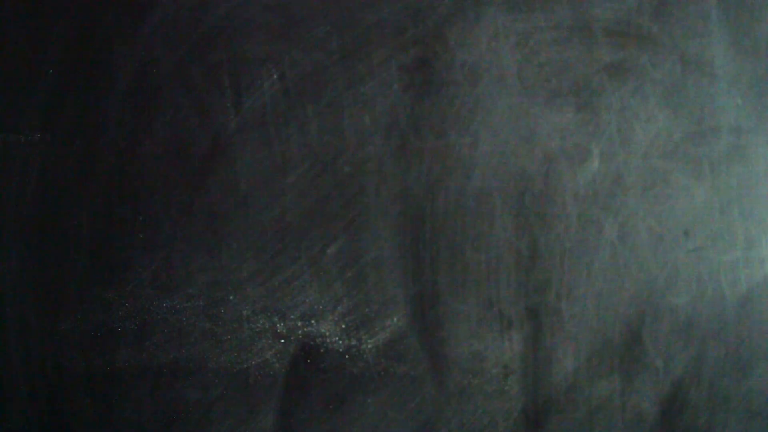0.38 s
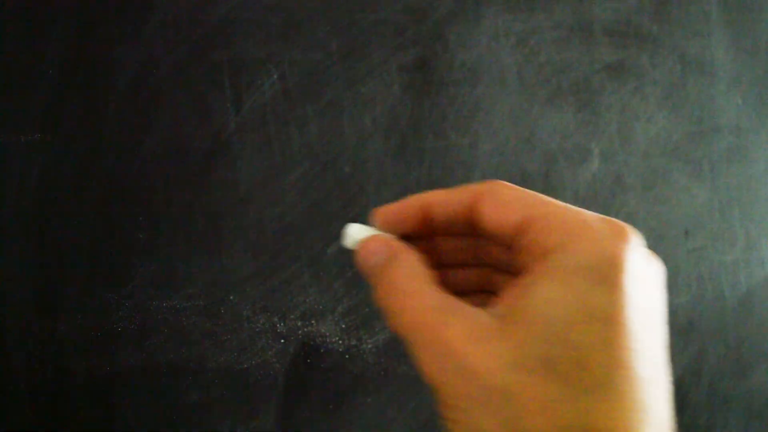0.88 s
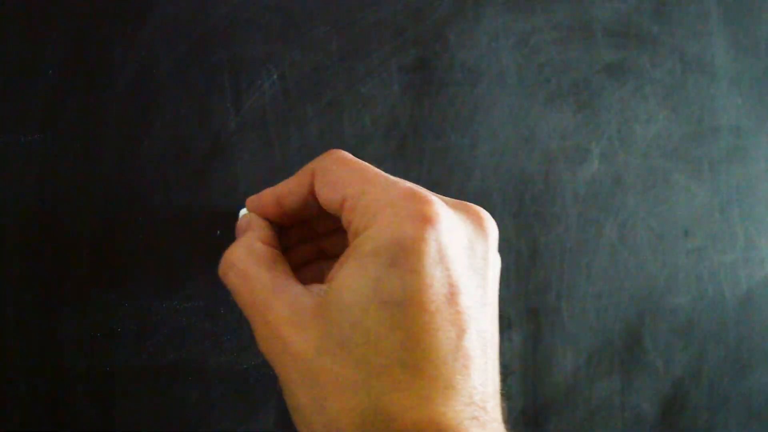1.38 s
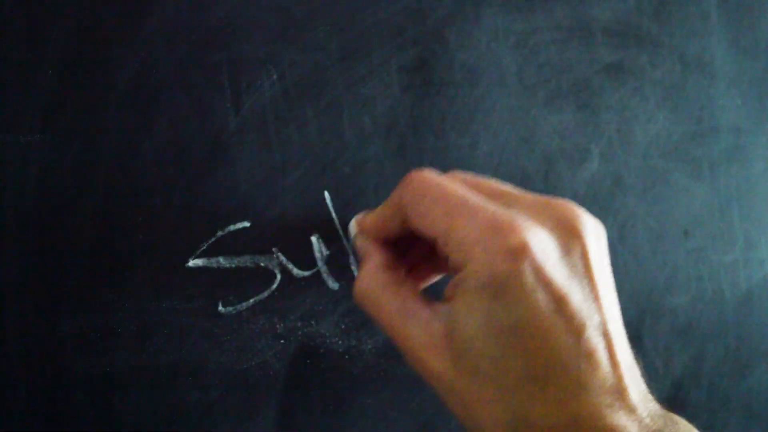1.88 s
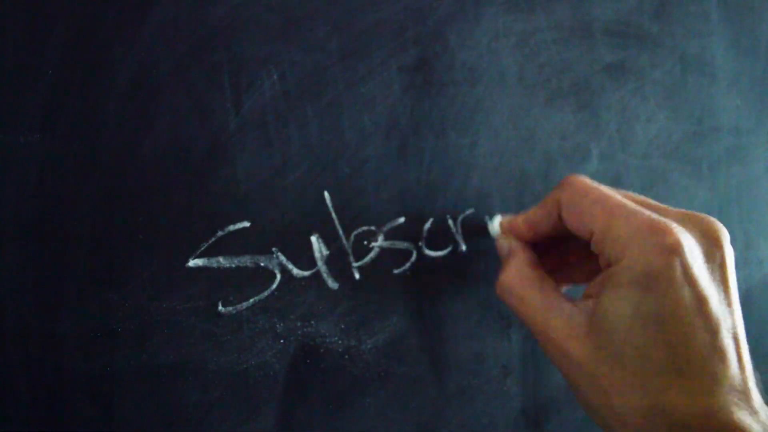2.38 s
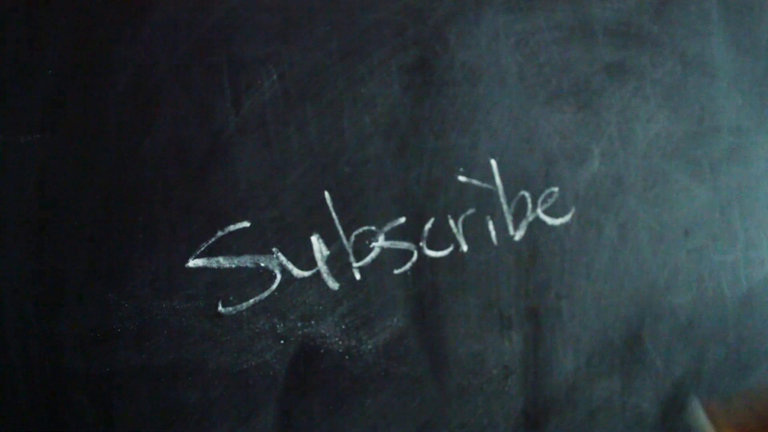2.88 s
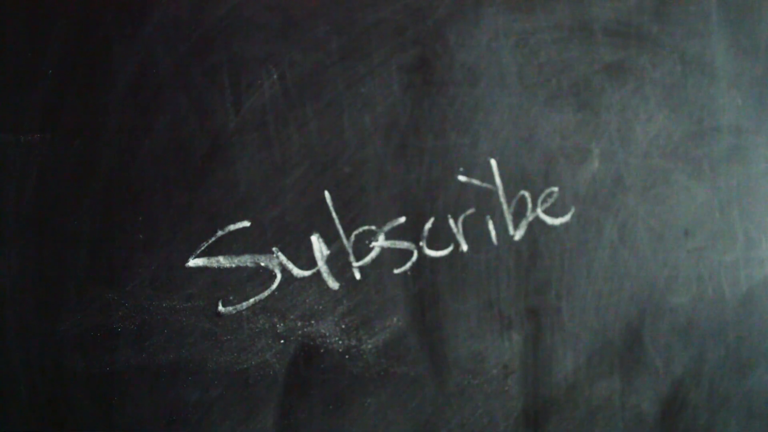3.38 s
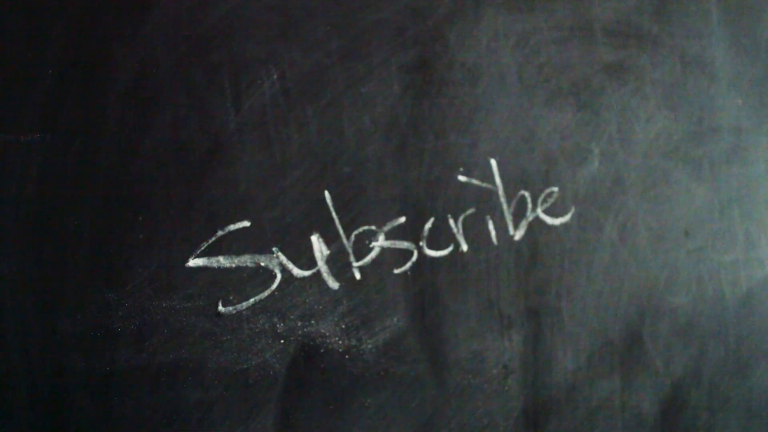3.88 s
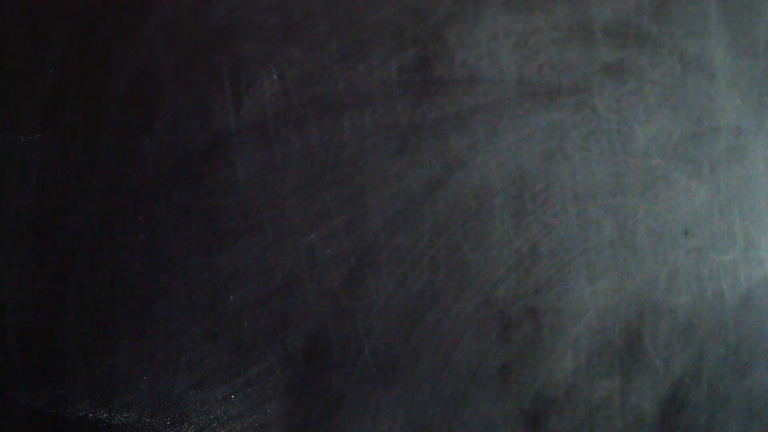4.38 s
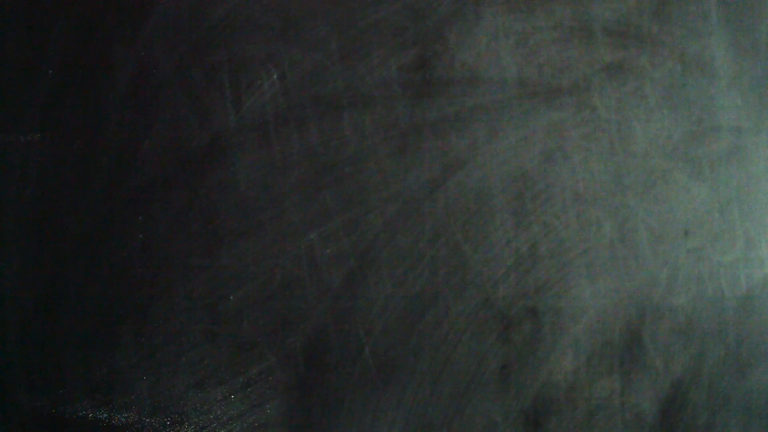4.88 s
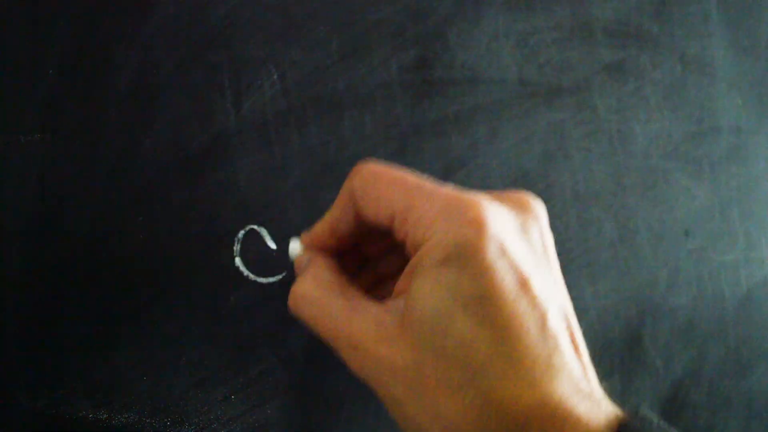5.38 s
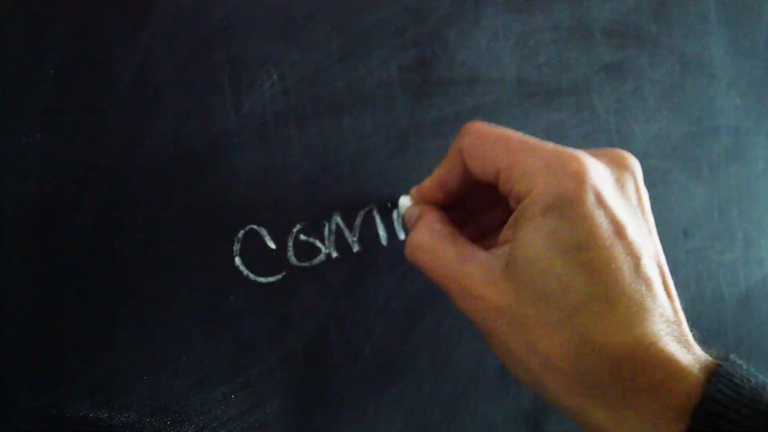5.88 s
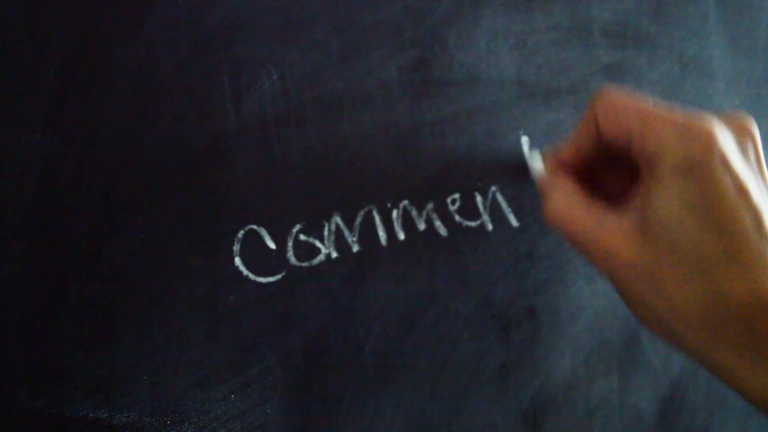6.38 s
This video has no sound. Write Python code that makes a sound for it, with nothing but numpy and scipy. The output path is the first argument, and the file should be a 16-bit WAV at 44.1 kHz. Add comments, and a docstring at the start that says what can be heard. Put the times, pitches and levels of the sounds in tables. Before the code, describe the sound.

Sped-up writing on a hollow board: a brief soft brush first, a pause, then chalk taps alternating with dry scratchy strokes and a loud final tap. Quiet again, then one broad felt swish with a low shudder, slight cloth rustle, and another run of brisk tapping and scratching, cut off mid-writing. Close mono pickup, reflective room, a faint noisy tail and very thin high whine.

```python
"""Chalk writes on a thin blackboard, heard sped up: crumbling taps, then short hissing, grating strokes.
Random crumbling forces excite the modes of the panel, which thuds and drones; powder adds shaped noise.
A felt eraser hisses as uneven noise; softer blows are things put down, and lumpy noise is a sleeve rustling.
Short tones tick and squeak, and a hard room answers with early taps and a faint long noise echo.
Still air and a thin steady whine lie beneath."""
import sys
import numpy as np
from scipy import signal
from scipy.fft import rfft, irfft
from scipy.io import wavfile
from scipy.ndimage import uniform_filter1d

SR = 44100
rng = np.random.default_rng(int(sys.argv[2]) if len(sys.argv) > 2 else 0)


def inscribe(sig):
    """Save sig as 16-bit PCM at rate SR to the path in sys.argv[1].

    A 1-D sig is mono; a 2-D sig holds one channel per row.
    Samples are clipped to [-1, 1] before scaling.
    """
    pcm = np.round(np.clip(np.atleast_2d(sig).T, -1, 1) * 32767)
    wavfile.write(sys.argv[1], SR, pcm.astype(np.int16))


def invert_db(x):
    """Field ratio 10**(x/20) for x, a level in decibels (scalar or array-like)."""
    u = np.asarray(x, float) / 20
    return 10 ** u


N = 287532  # samples

# chalk landing on the board: t/s, thud f/Hz, thud level/dB, knock level/dB, crack level/dB
CHALK_TAPS = [(1.383, 157, -77, -41.5, -58), (1.637, 219, -42, -35.5, -44.5), (1.839, 170, -29.5, -43, -42),
              (2.034, 167, -41.5, -39, -49), (2.182, 107, -37.5, -33, -57), (2.271, 152, -34.5, -41, -53),
              (2.413, 133, -39.5, -30, -27), (2.514, 161, -32, -30, -30), (2.835, 165, -28.5, -23, -12.5),
              (5.269, 146, -50, -42.5, -61.5), (5.47, 159, -32.5, -34.5, -21),
              (5.616, 100, -42.5, -45.5, -57), (5.866, 166, -40.5, -31, -30), (6.097, 107, -33, -38, -46),
              (6.25, 104, -32.5, -33, -40.5), (6.419, 107, -28, -29.5, -35), (6.519, 91, -33.5, -30.5, -21)]
# eraser, knuckles and things put down: t/s, thud f/Hz, thud level/dB, knock level/dB, crack level/dB
SOFT_BUMPS = [(0.069, 286, -31, -43, -43.5), (0.097, 305, -56, -44.5, -47), (0.161, 328, -54, -64, -87),
              (0.283, 434, -51.5, -62, -77), (0.305, 71, -55, -87, -94), (0.823, 129, -38, -61.5, -68),
              (0.844, 137, -39.5, -59, -61), (0.969, 180, -69, -63, -87), (1.289, 204, -63, -68, -87),
              (2.806, 294, -42.5, -62, -64.5), (2.877, 130, -40.5, -46.5, -61), (3.007, 136, -50, -75, -97),
              (3.041, 278, -47, -120, -97), (3.227, 330, -56, -58, -80), (4.099, 193, -57.5, -61.5, -49),
              (4.602, 310, -69.5, -60.5, -69), (4.908, 203, -87.5, -58.5, -72.5),
              (5.012, 194, -62, -60.5, -73)]
# short pieces of chalk stroke, and a few drones just after taps: t/s, length/s, hiss level/dB, drone level/dB
STROKE_PIECES = [(1.43, 0.058, -45.5, -52), (1.483, 0.037, -38, -58), (1.52, 0.049, -45, -48),
                 (1.651, 0.056, -44, -66), (1.705, 0.031, -47, -49.5), (1.739, 0.045, -45, -60.5),
                 (1.803, 0.033, -60, -67), (1.839, 0.047, -44, -53), (1.89, 0.047, -49.5, -64),
                 (1.926, 0.079, -48, -60.5), (2.04, 0.033, -44.5, -49.5), (2.074, 0.063, -45, -56.5),
                 (2.172, 0.076, -48, -53.5), (2.277, 0.042, -49, -53.5), (2.322, 0.068, -53, -52.5),
                 (2.417, 0.028, -46, -45), (2.454, 0.034, -72, -47.5), (2.523, 0.036, -39.5, -52),
                 (2.565, 0.038, -45.5, -49), (2.609, 0.052, -46, -61), (2.664, 0.05, -43.5, -62.5),
                 (2.707, 0.093, -47, -58), (2.852, 0.038, -66, -47), (5.268, 0.047, -67, -59.5),
                 (5.31, 0.079, -52.5, -45.5), (5.357, 0.079, -47, -62), (5.479, 0.045, -48.5, -57),
                 (5.507, 0.047, -46, -56), (5.541, 0.052, -51, -40), (5.63, 0.025, -46, -51),
                 (5.665, 0.031, -45, -46.5), (5.697, .043, -47.5, -59), (5.743, 0.04, -46.5, -50.5),
                 (5.784, 0.044, -48, -63), (5.877, 0.024, -44.5, -43), (5.908, .031, -46.5, -46),
                 (5.944, 0.04, -47, -55.5), (5.988, 0.046, -50, -55.5), (6.034, 0.038, -49, -52),
                 (6.115, 0.044, -55.5, -45), (6.142, 0.085, -49.5, -55.5), (6.22, 0.0043, -70, -55),
                 (6.248, 0.04, -45.5, -44.5), (6.296, 0.026, -46.5, -46), (6.326, 0.049, -46.5, -52),
                 (6.422, 0.048, -38, -51.5)]
# felt across the board, one list a pass: t/s, hiss level/dB
FELT_PASSES = [
    [(0.0, -35), (0.032, -37), (0.058, -49)],
    [(4.11, -53), (4.138, -39.5), (4.224, -33.5), (4.296, -40), (4.386, -41.5), (4.406, -61)],
]
# hand and sleeve moving: t/s, length/s, rustle level/dB, brushing level/dB (both before the sag)
SLEEVE_MOVES = [(0.12, 0.037, -54, -59), (0.258, 0.056, -64, -58.5), (0.792, 0.17, -66.5, -60.5),
                (.98, 0.074, -75, -70.5), (2.981, 0.01, -83, -46), (3.945, 0.14, -74.5, -65.5),
                (4.404, .17, -61.5, -89), (4.602, 0.31, -64.5, -84.5), (4.9, 0.052, -60.5, -75),
                (4.969, 0.034, -62.5, -80), (5.016, 0.073, -50, -59), (5.108, 0.19, -59.5, -67)]
# modes of the board: nominal f/Hz, width/Hz, nominal level/dB
BOARD_MODES = [(44.5, 33, -3), (98, 76, -4), (130, 140, -3.5), (220, 81, -3.5), (264.7, 60, -3.5),
               (331, 55, 1), (497, 77, -5.5), (680, 80, -8.5), (820, 80, -9), (1082, 68, -9.5),
               (1335, 66, 1.5), (1444, 70, -13.5), (1804, 50, -0.5), (2080, 300, -7.5), (2610, 710, -9.5),
               (3120, 1200, -17), (3671, 100, -17), (4360, 900, -18), (5870, 100, -16.5), (6700, 220, -11)]
# band edges of thud, panel and knock: lower f/Hz, upper f/Hz
REGISTER_EDGES = [(38, 900), (230, 700), (560, 7000)]
# spectrum of the dust's hiss and crack, with a bright peak near 9.5 kHz that other sounds share: f/Hz, relative
# level/dB
POWDER_SPECTRUM = [(2650, -24.5), (4500, -15), (5240, -10.5), (5660, -9), (7010, -4.5), (7660, -6.5),
                   (9490, 5), (11200, -4), (14400, -25.5), (15700, -32.5)]
# spectrum of rubbing felt: f/Hz, relative level/dB
FELT_SPECTRUM = [(88, -17), (150, -12.5), (197, -21), (235, -42), (291, -15), (621, -36.5), (725, -30),
                 (2240, -17), (3180, -19), (9640, -2.5), (15700, -18.5)]
# spectrum of moving cloth: f/Hz, relative level/dB
CLOTH_SPECTRUM = [(80, -16), (200, -3.5), (450, -16), (800, -4), (1150, -10), (1500, -10.5), (2100, -10.5),
                  (2900, -10), (3300, -12), (3600, -21), (6000, -74.5)]
# spectrum of still air: f/Hz, relative level/dB
AIR_SPECTRUM = [(20, 3), (40, -0.5), (65, -24.5), (130, -19), (300, -2.5), (530, -18), (1500, -13),
                (2800, -25), (5000, -21), (9700, -19), (13000, -19), (15500, -14.5)]
# thin electrical tone: f/Hz, rms level/dB
WHINE_TONES = [(15692, -76)]
# small ticks and squeaks: centre t/s, f/Hz, peak level/dB, swell half-length/s
TICKS_AND_SQUEAKS = [(.862, 2120, -49, 0.0028), (0.976, 2095, -52, 0.0036), (1.285, 1284, -57, 0.0084),
                     (3.274, 1730, -65.5, 0.023), (4.334, 1480, -37, .006), (5.012, 2930, -40, 0.0011),
                     (6.327, 820, -41, 0.0084)]
# reverberation of the room: f/Hz, t60/s
ROOM_T60 = [(100, 2.2), (400, 1.8), (1500, 2.3), (5000, 3.4), (12000, 3.7)]
# colour of the long echo: f/Hz, gain/dB
LONG_ECHO_COLOUR = [(35, 0), (70, -15.5), (130, -1.5), (300, 1.5), (1500, -0.5), (3200, -1), (6000, -3),
                    (10000, -6), (15000, 1.5)]

AIR_DB, EARLIER_WIPE_DB = -74, -55  # the earlier wiping at t = 0
ECHO_DB, BLOW_SEND_DB, EARLY_DB = -11.5, -4.5, -11
SPOT_DB = 2.8  # spread of a mode's strength from place to place
# the panel register lies between thud and knock
PANEL_SHARE, TAP_PANEL_DB, BUMP_PANEL_DB = 0.47, 0, -1.5
# a bump whose crack nears its thud or knock reaches the high modes
SOFT_TOP_HZ, HARD_TOP_HZ, HARD_FROM_DB = 2410, 8100, -9
# grating grows with speed (dB per dB of hiss) and with pressure (dB per dB of drone)
GRIT_DB, GRIT_BY_HISS, GRIT_BY_DRONE = -53.5, 0.15, 0.4
USUAL_HISS_DB, USUAL_DRONE_DB = -48, -53
# the drone is low just after a tap and climbs as the letter goes on
LANDED_HZ, UNDERWAY_HZ, SETTLE_S = 269, 484, 0.12
# the hand leans in and the panel shakes
SHUDDER_S, SHUDDER_DB, SHUDDER_RISE_S, SHUDDER_FALL_S = 4.19, -49, 0.02, 0.049
RUSTLE_RISE_S, RUSTLE_FALL_S, RUSTLE_SAG_DB_PER_S = 0.033, 0.06, 42.5


def evened(x):
    """Normalisation: scales a signal to rms 1."""
    return x / np.sqrt(np.mean(x ** 2, -1, keepdims=True) + 1e-20)


def smooth_noise(n, size):
    """Moving average of white noise: a slow random curve of rms 1."""
    return evened(uniform_filter1d(rng.standard_normal(n), size=size))


def read(points, hz):
    """Interpolation of a spectrum on a logarithmic frequency axis."""
    f, value = np.transpose(points)
    return np.interp(np.log(hz + 1), np.log(f + 1), value)


def add(mix, s, sound):
    """Superposition: mixes a sound in at s seconds."""
    part = mix[max(round(s * SR), 0):][:len(sound)]
    part += sound[:len(part)]


def crumbs(n, spread_db):
    """Impulsive noise: dense clicks of random sign, a few of them large, rms 1."""
    size_db = spread_db * np.minimum(rng.exponential(1, n), 5)
    return evened(rng.standard_normal(n) * invert_db(size_db))


def coloured(x, points):
    """Linear filtering: weights the spectrum of x, then restores rms 1."""
    gain = invert_db(read(points, np.fft.rfftfreq(len(x), 1 / SR)))
    return evened(irfft(rfft(x) * gain, len(x)))


def background():
    """Stationary noise of still air, with a thin steady sinusoidal whine."""
    t = np.arange(N) / SR
    whine = sum(np.sqrt(2) * invert_db(db) * np.sin(2 * np.pi * hz * t) for hz, db in WHINE_TONES)
    return invert_db(AIR_DB) * coloured(rng.standard_normal(N), AIR_SPECTRUM) + whine


def earlier_wiping():
    """Exponential decay: the echo of wiping just before dies away at 30.8 dB/s."""
    t = np.arange(N) / SR
    return invert_db(EARLIER_WIPE_DB - 30.8 * t) * coloured(rng.standard_normal(N), FELT_SPECTRUM)


def near_walls(x):
    """Early reflection: convolution with a quick cluster of sparse random taps."""
    taps, at = np.zeros(8192), np.arange(300, 8160, 20)
    taps[at + rng.integers(0, 20, len(at))] = rng.choice([-1., 1.], len(at))
    taps *= invert_db(-60 * np.arange(len(taps)) / SR / 0.037)  # t60 of 37 ms
    return invert_db(EARLY_DB) * signal.fftconvolve(x, taps / np.linalg.norm(taps))[:N]


def long_echo(x):
    """Diffuse field: the power of each band fills a store that drains by its t60 and sounds as noise."""
    hz, t, z = signal.stft(x, SR, nperseg=1024, noverlap=768)
    power = uniform_filter1d(abs(z) ** 2, size=15, axis=0)
    # above 1.7 kHz the echo's spectrum is smoothed more widely
    power[40:] = uniform_filter1d(power, size=70, axis=0)[40:]
    keep = invert_db(-120 * t[1] / read(ROOM_T60, hz))  # share of power kept from frame to frame
    store = np.array([signal.lfilter([0, 0, 0, 1 - k], [1, -k], p) for k, p in zip(keep, power)])
    real, imaginary = rng.standard_normal((2,) + z.shape)
    size = np.sqrt(abs(store)) * invert_db(read(LONG_ECHO_COLOUR, hz))[:, None]
    field = size * (real + 1j * imaginary)
    return invert_db(ECHO_DB) * signal.istft(field, SR, nperseg=1024, noverlap=768)[1][:N]


def chirps():
    """Narrow-band tones: sinusoids under a soft Gaussian swell."""
    t = np.arange(N) / SR
    return sum(invert_db(db) * np.exp(-((t - s) / length) ** 2) * np.sin(2 * np.pi * hz * t)
               for s, hz, db, length in TICKS_AND_SQUEAKS)


def sleeve():
    """Friction noise of cloth, lumpy, with a bright brushing; each move starts briskly and slackens."""
    t, gains = np.arange(N) / SR, np.zeros((2, N))
    for s, length, *levels_db in SLEEVE_MOVES:
        rise = (t - s) / RUSTLE_RISE_S
        fall = 1 + (s + length - t) / RUSTLE_FALL_S
        edge = np.clip(np.minimum(rise, fall), 0, 1)
        sag = invert_db(-RUSTLE_SAG_DB_PER_S * np.clip(t - s, 0, 1))
        gains += invert_db(np.array(levels_db))[:, None] * edge * sag
    lumps = invert_db(2.5 * smooth_noise(N, 600))
    z = signal.stft(lumps * coloured(crumbs(N, 3.0), CLOTH_SPECTRUM), nperseg=512)[2]
    folds = uniform_filter1d(rng.standard_normal(z.shape), size=9, axis=1)
    folds = uniform_filter1d(folds, size=5, axis=0)
    folds = evened(folds.ravel()).reshape(z.shape)  # folds shift the colour
    rustle = evened(signal.istft(z * invert_db(3.5 * folds), nperseg=512)[1][:N])
    return gains[0] * rustle + gains[1] * coloured(crumbs(N, 0.5), POWDER_SPECTRUM)


def panel_shudder():
    """Forced vibration: a brief slow 68 Hz shaking of the panel as the hand leans in."""
    t = np.arange(N) / SR
    width = np.where(t < SHUDDER_S, SHUDDER_RISE_S, SHUDDER_FALL_S)
    lean = np.exp(-((t - SHUDDER_S) / width) ** 2)
    return invert_db(SHUDDER_DB) * lean * np.sqrt(2) * np.sin(2 * np.pi * 68 * t)


def eraser():
    """Distributed friction: felt hisses as coloured noise that follows the effort of the hand."""
    t = np.arange(N) / SR
    effort = sum(invert_db(np.interp(t, *np.transpose(rows), -200, -200)) for rows in FELT_PASSES)
    nap = invert_db(1.2 * smooth_noise(N, 500))  # the felt drags unevenly
    felt = coloured(crumbs(N, 1.4), FELT_SPECTRUM)
    return uniform_filter1d(effort, size=400, mode="nearest") * nap * felt


def board(push, x, dust, push_hz, push_width, top_hz, dry_db):
    """Modal superposition: a push gives thud, a crumbling force x panel and knock, the dust crack or hiss."""
    f = np.fft.rfftfreq(len(x), 1 / SR) + 1e-9
    spot = rng.standard_normal((len(BOARD_MODES), 2))  # the spot decides which modes speak
    ring = 0
    for k, ((hz, width, db), (strength, shift)) in enumerate(zip(BOARD_MODES, spot)):
        mode_hz = hz * (1 + 0.041 * shift)
        gain = (-1) ** k * invert_db(db + SPOT_DB * strength)
        ring = ring + gain * width * hz / (mode_hz ** 2 - f ** 2 + 1j * width * f)
    thud, panel, top = [1 / ((1 + lo / (1j * f)) * (1 + 1j * f / hi)) ** 2 for lo, hi in REGISTER_EDGES]
    thud = thud * (0.07 + np.exp(-((f - push_hz) / push_width) ** 2))  # favours the modes near its own pace
    top = top / (1 + (f / top_hz) ** 6)  # a softer contact stops short of the high modes
    ripple = uniform_filter1d(rng.standard_normal(len(f)), size=12)
    ripple = evened(uniform_filter1d(ripple, size=12))
    # high modes too dense to list, ringing only after the force
    crowd = np.exp(0.2 * np.conj(signal.hilbert(ripple)))
    # the dry contact fills the gaps between modes; minimum phase makes the knock follow the force
    cepstrum = irfft(np.log(np.hypot(abs(ring), invert_db(dry_db))))
    fold = np.r_[1, 2 * np.ones(len(f) - 2), 1, np.zeros(len(f) - 2)]
    knock = np.exp(rfft(cepstrum * fold))
    powder = invert_db(read(POWDER_SPECTRUM, f)) * crowd
    shapes = np.array([ring * thud, ring * panel, knock * top * crowd, powder])
    return irfft(rfft([push, x, x, dust]) * shapes, len(x))


def blow(span, panel_db, top_hz, s, push_hz, thud_db, knock_db, crack_db):
    """Impact: a short blow with a softly rounded onset, a fast fall and a weak trail of dust."""
    t = np.arange(8192) / SR - 0.04
    u = t / span  # span in s
    onset = np.exp(-abs(u / 0.4) ** 2.19)
    fall = np.exp(-(u / 0.21) ** 2) * 0.7 + 0.51 * np.exp(-abs(u) / 0.58)
    force = np.where(u < 0, onset, fall)
    push = np.exp(-((t + 0.003) * push_hz / 0.16) ** 2)  # a deeper thud comes from a slower push
    crumble, dust = force * crumbs(len(t), 3.1), force * crumbs(len(t), 2.4)
    parts = board(push, crumble, dust, push_hz, 63, top_hz, dry_db=-1.5)
    parts /= np.sqrt((parts ** 2).sum(1, keepdims=True) / (0.016 * SR))  # level over 16 ms
    panel_db = panel_db + PANEL_SHARE * thud_db + (1 - PANEL_SHARE) * knock_db
    return s - 0.04, invert_db(np.array([thud_db, panel_db, knock_db, crack_db])) @ parts


def bumps():
    """Soft impact: a longer blow, whose hardness sets how high the modes are reached."""
    out = np.zeros(N)
    for row in SOFT_BUMPS:
        hard = 1 / (1 + invert_db(HARD_FROM_DB - row[4] + max(row[2:4])) ** 2)
        top_hz = SOFT_TOP_HZ + (HARD_TOP_HZ - SOFT_TOP_HZ) * hard
        add(out, *blow(0.026, BUMP_PANEL_DB, top_hz, *row))
    return out


def chalk_taps():
    """Hard impact: the chalk lands with a shorter crumbling blow that reaches the high modes."""
    out = np.zeros(N)
    for row in CHALK_TAPS:
        add(out, *blow(0.018, TAP_PANEL_DB, HARD_TOP_HZ, *row))
    return out


def strokes():
    """Dry friction: each piece swells and fades; powder hisses, grains grate and the panel drones."""
    out, t = np.zeros(N), np.arange(8192) / SR
    for s, length, hiss_db, drone_db in STROKE_PIECES:
        middle = s + length / 2
        since_tap = middle - max(row[0] for row in CHALK_TAPS if row[0] < middle)
        drone_hz = UNDERWAY_HZ - (UNDERWAY_HZ - LANDED_HZ) * np.exp(-(since_tap / SETTLE_S) ** 2)
        by_speed = GRIT_BY_HISS * (hiss_db - USUAL_HISS_DB)
        by_pressure = GRIT_BY_DRONE * (drone_db - USUAL_DRONE_DB)
        grit_db = GRIT_DB + by_speed + by_pressure
        to_edge = np.minimum(t, length + 0.011 - t)
        swell = np.sin(np.pi / 2 * np.clip(to_edge / (0.0074 + 0.25 * length), 0, 1))
        pressure = invert_db(2.0 * smooth_noise(len(t), 250))  # never even
        snags = invert_db(4.5 * np.clip(smooth_noise(len(t), 500), -2, 2))  # the tip catches
        rub = swell * snags * crumbs(len(t), 3.4)
        dust = swell ** 2.1 * pressure * crumbs(len(t), 1.2)
        drone, _, grit, hiss = board(rub, rub, dust, drone_hz, 320, top_hz=7000, dry_db=-8.5)
        parts = np.array([hiss, grit, drone])
        parts /= np.sqrt((parts ** 2).sum(1, keepdims=True) / (length * SR))  # level over the length
        # the piece sets in 4 ms ahead of its listed time
        add(out, s - 0.004, invert_db(np.array([hiss_db, grit_db, drone_db])) @ parts)
    return out


def scene():
    """Superposition of direct sound, echoes and background; a blow's treble beams and feeds the room less."""
    rubbing = strokes() + eraser() + panel_shudder() + sleeve() + chirps()
    blows = chalk_taps() + bumps()
    dull = signal.lfilter([0.25], [1, -0.75], blows)
    sent = invert_db(BLOW_SEND_DB) * (dull + 0.083 * blows)
    echoes = near_walls(rubbing + blows) + long_echo(rubbing + sent)
    return (rubbing + blows + echoes + earlier_wiping() + background())[None]


def roll_off(x):
    """The treble ends steeply here."""
    return signal.sosfilt(signal.butter(12, 15820, fs=SR, output="sos"), x)


def record(dry):
    """Amplitude limiting: one microphone channel, clipped at full scale."""
    mix = np.clip(dry, -1, 1)
    return roll_off(mix)


dry = scene()
out = record(dry)
inscribe(out)
```